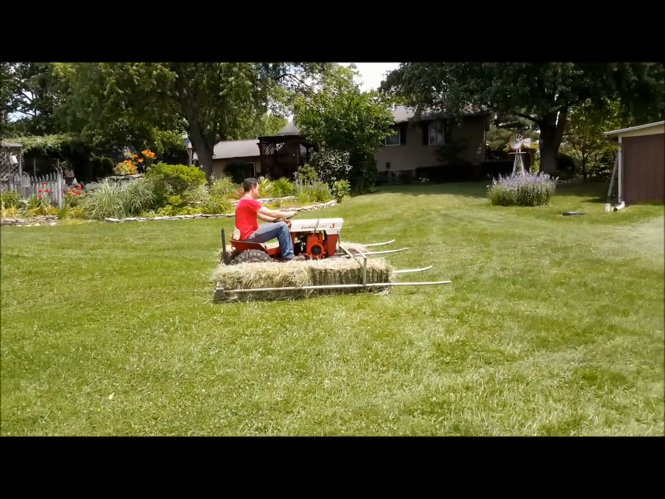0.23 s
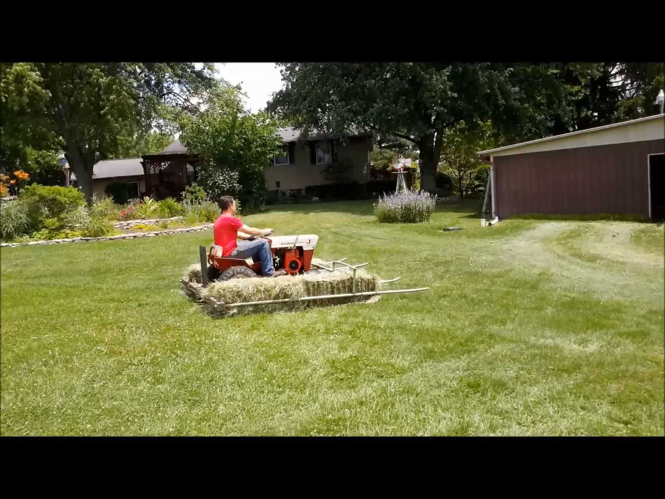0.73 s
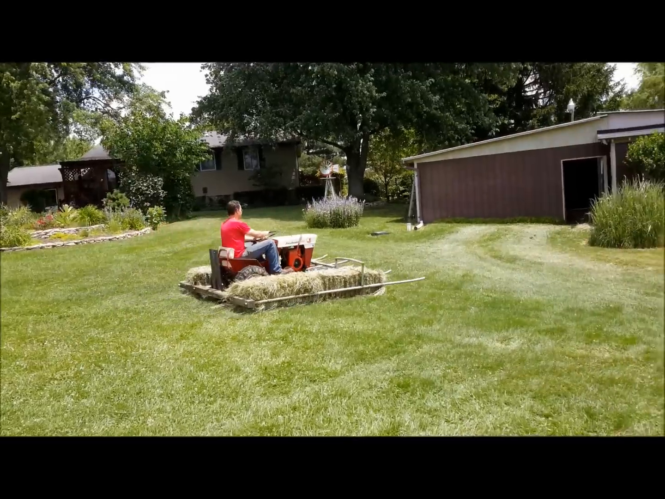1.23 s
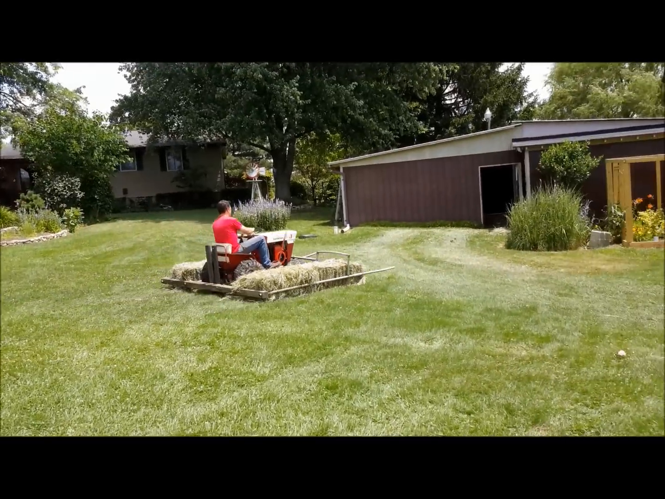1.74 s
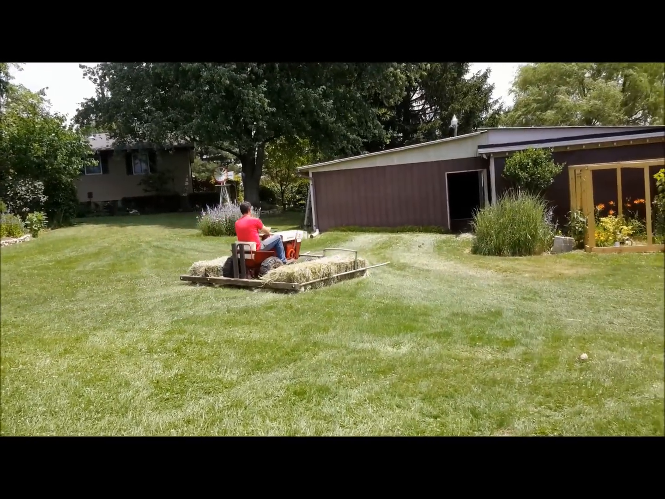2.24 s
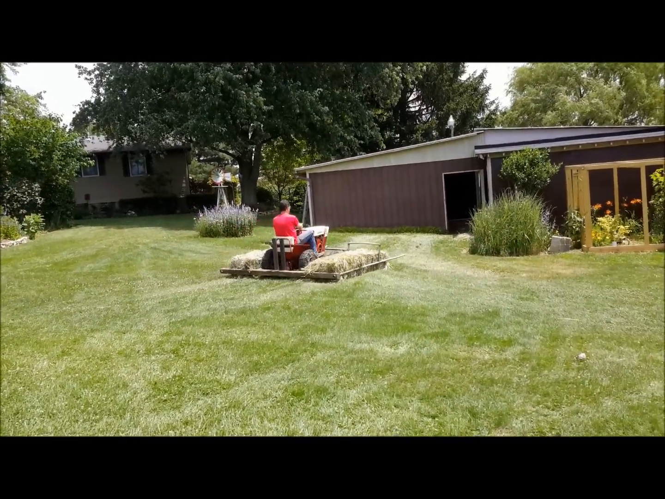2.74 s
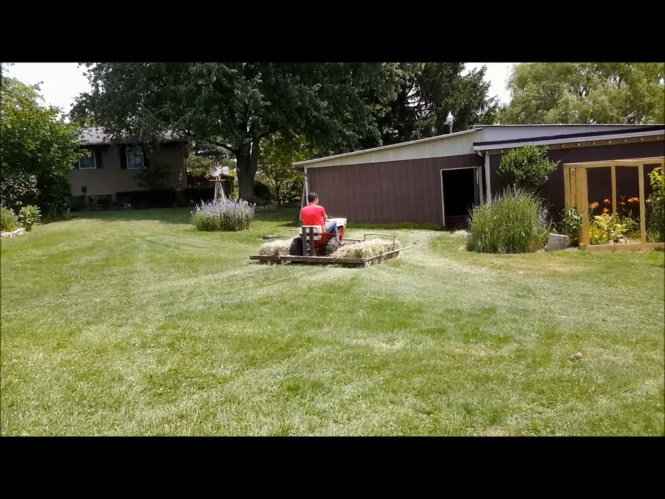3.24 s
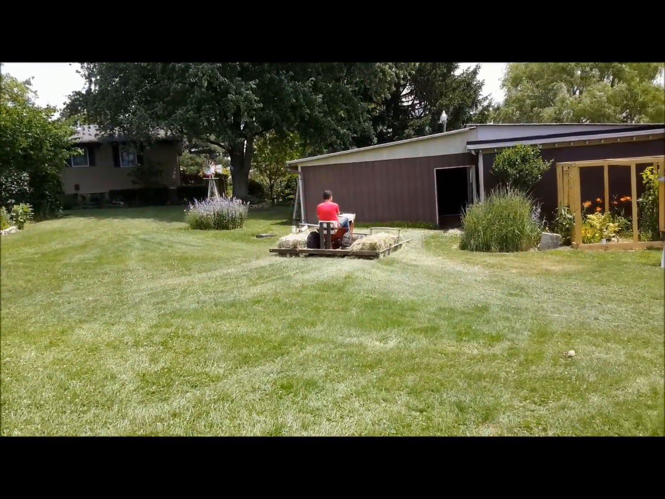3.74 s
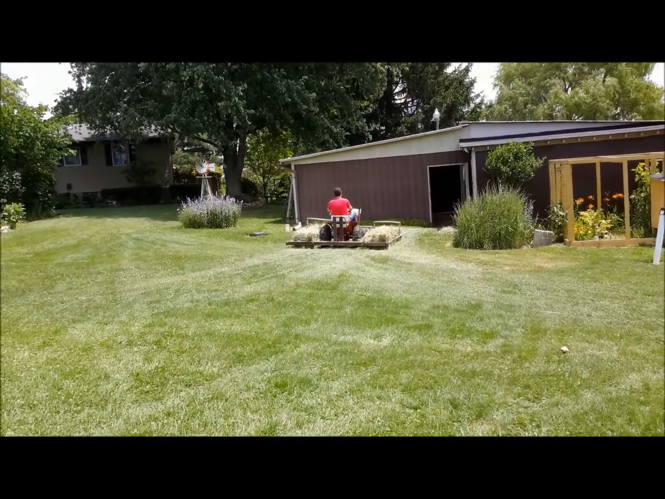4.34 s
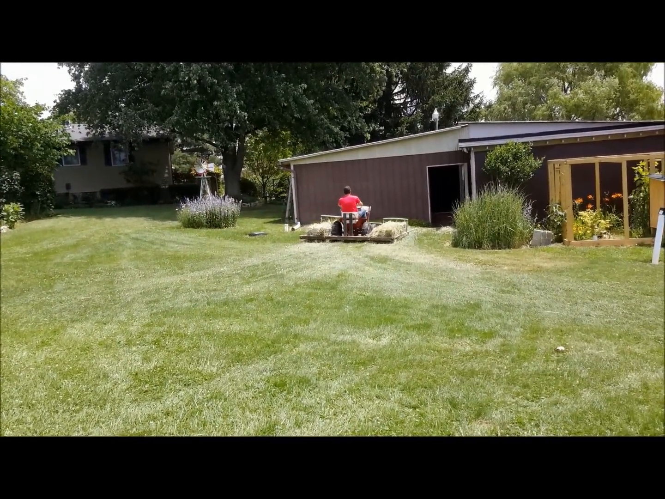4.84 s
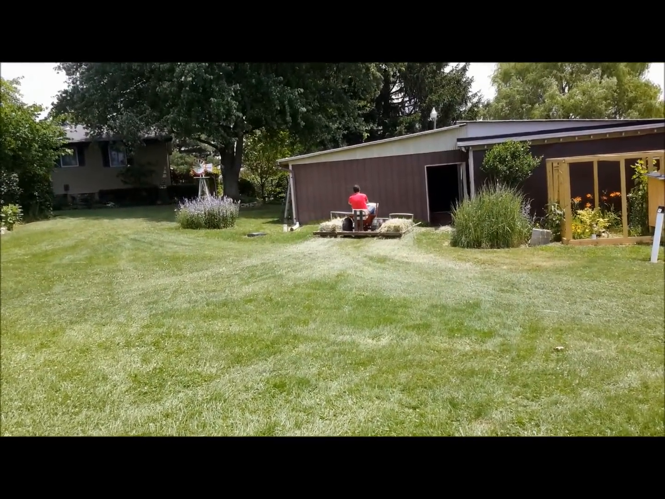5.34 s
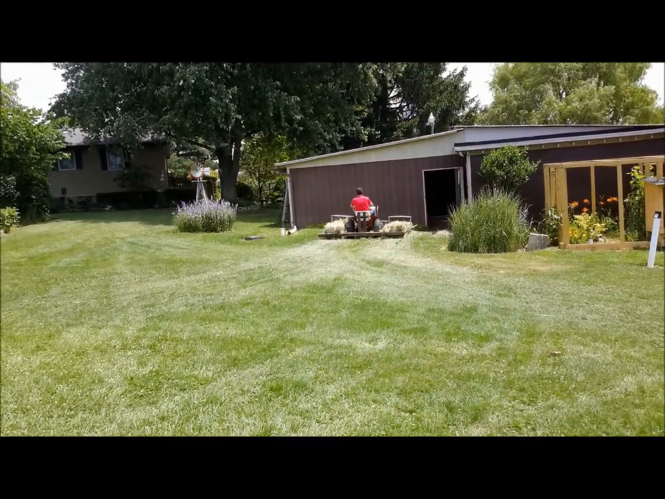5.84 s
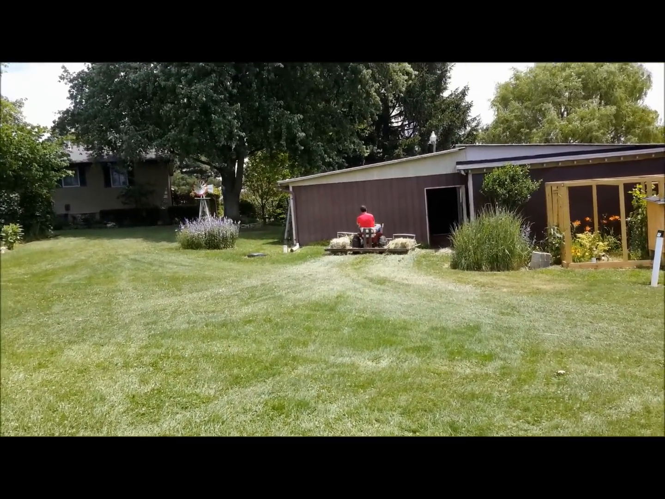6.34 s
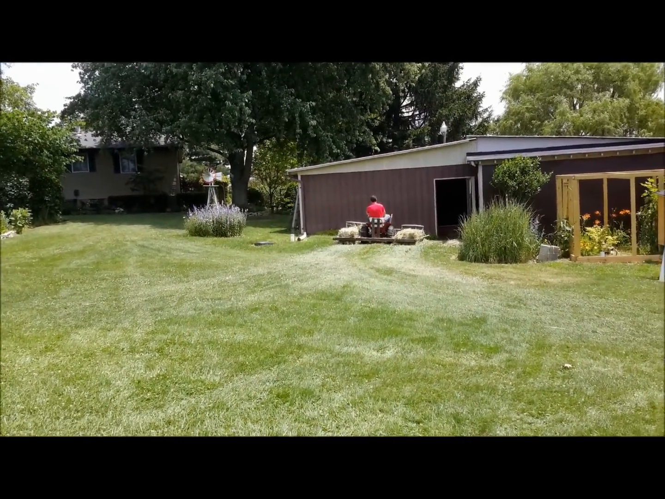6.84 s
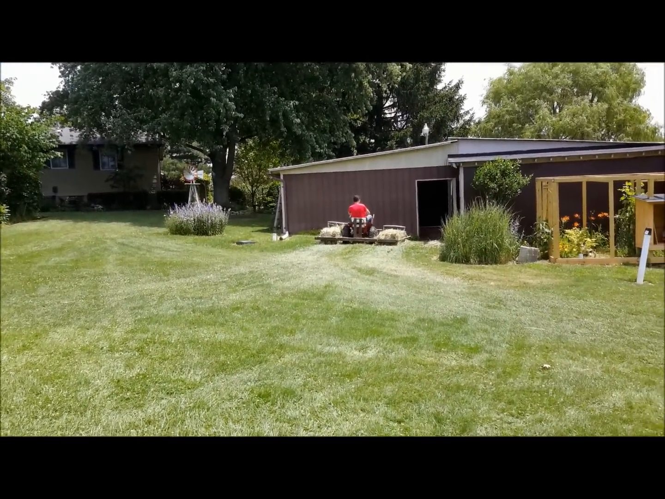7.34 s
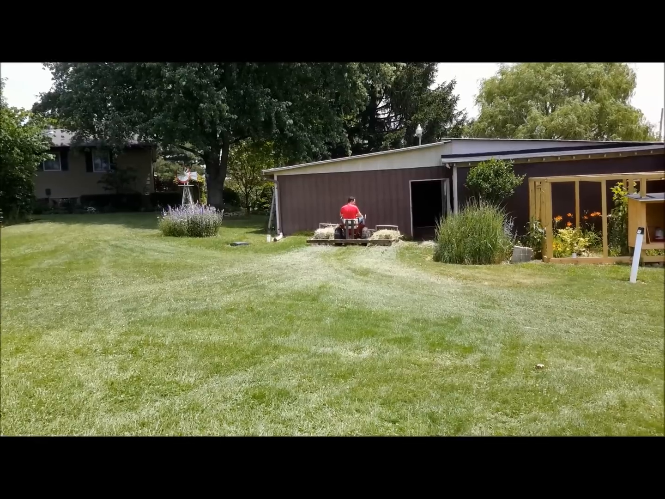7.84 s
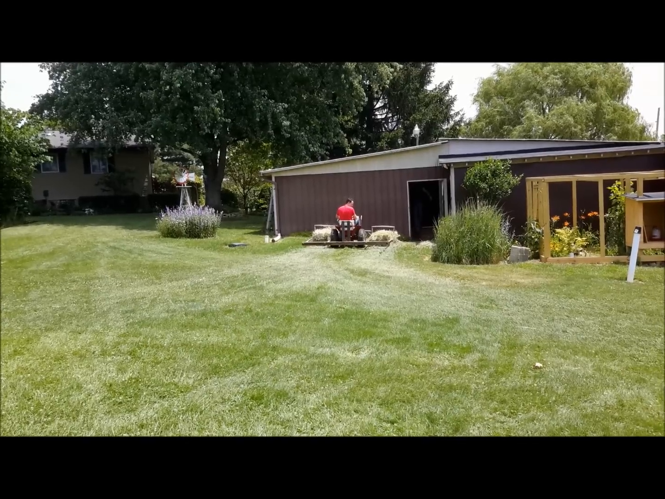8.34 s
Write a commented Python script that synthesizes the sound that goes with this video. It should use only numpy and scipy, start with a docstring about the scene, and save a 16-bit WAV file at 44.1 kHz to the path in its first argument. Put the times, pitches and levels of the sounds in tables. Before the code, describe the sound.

A one-cylinder garden tractor is running close by outdoors from the start, with a rapid, even exhaust thud, metallic clatter and valve ticking. Wind rumbles on the microphone, with sharp buffeting thumps strongest from 1 to 2.5 seconds and from 5 to 6 seconds, and brief ones near 6.7 and 7.7. A slipping belt chirps rhythmically from about 0.5 to 2 seconds, from 2.5 to 5.5, and briefly near 7.8. The load carrier gives short, high squeaks around 1, 1.5, 4 and 5.4 seconds. A very faint, high sizzle lies underneath until about 6 seconds. From then on the clatter is softer and more distant, and the engine slows, sagging lowest near 7.7 seconds before picking up a little. A few small birds chirp faintly between 6 and 8 seconds. The engine is still running at the end, around 8.5 seconds.

```python
"""A one-cylinder garden tractor thuds and clatters close by while gusts of wind buffet the microphone.
Each firing sends a pressure pulse from the exhaust and ticks a valve; impacts ring the block and tinware.
A slipping belt chirps once per lap, drifting against the beat, and the carrier squeaks under hay bales.
The tractor crosses a lawn, turns away and slows in front of a shed, whose wall reflects its sound.
A faint, high sizzle comes and goes, and towards the end a few birds chirp."""
import sys
import numpy as np
from scipy import signal
from scipy.fft import rfft, irfft, next_fast_len
from scipy.io import wavfile
from scipy.ndimage import uniform_filter1d, map_coordinates

SR = 44100
rng = np.random.default_rng(int(sys.argv[2]) if len(sys.argv) > 2 else 0)


def dump(signal):
    """Clip the signal to [-1, 1] and save it as 16-bit WAV at the path in sys.argv[1]."""
    limited = np.clip(np.atleast_2d(signal).T, -1, 1)
    pcm = np.round(limited * 32767).astype(np.int16)
    wavfile.write(sys.argv[1], SR, pcm)


N = 378813


def amp(db):
    """Decibels to amplitude ratio."""
    return 10 ** (np.asarray(db) / 20)


def unit(x):
    """Normalisation to rms 1."""
    return x / np.sqrt(np.mean(x ** 2) + 1e-20)


def curves(rows):
    """Linear interpolation: one value per sample for each column after the time."""
    times, *columns = np.transpose(rows)
    return [np.interp(np.arange(N) / SR, times, column) for column in columns]


def wobble(rate):
    """Smooth random modulation: a spline through rate knots a second."""
    return map_coordinates(rng.standard_normal(4096), [np.arange(N) * rate / SR], mode="wrap")


def coloured(x, spectrum, size=16384):
    """Minimum-phase filtering by a (frequency_hz, level_db) spectrum, at rms 1."""
    hz, db = np.transpose(spectrum)
    gain = amp(np.interp(np.log(np.fft.rfftfreq(size, 1 / SR) + 1), np.log(hz), db))
    cepstrum = irfft(np.log(np.maximum(gain, 1e-5)))
    cepstrum[1:size // 2] *= 2
    cepstrum[size // 2 + 1:] = 0
    response = irfft(np.exp(rfft(cepstrum)))
    return unit(signal.fftconvolve(x, response)[:N])


def noise(spectrum):
    """Filtered Gaussian noise of rms 1."""
    return coloured(rng.standard_normal(N), spectrum)


def pulses(cycle, place, scatter_db, jitter_s):
    """A quasi-periodic impulse train: one hit each time the cycle passes a place."""
    timing, strength = rng.standard_normal((256, 2)).T
    at = np.interp(np.arange(len(timing)) + place, cycle, np.arange(N), left=-SR, right=2 * N)
    at += jitter_s * SR * timing
    heard = (at >= 0) & (at < N)
    return np.bincount(at[heard].astype(int), amp(scatter_db * strength[heard]), N)


def bursts(hits, rise_s, decay_s):
    """An envelope of rms 1 with exponential rise and decay after each hit."""
    t = np.arange(SR // 10) / SR
    return unit(signal.fftconvolve(hits, (1 - np.exp(-t / rise_s)) * np.exp(-t / decay_s))[:N])


def swells(rows, attack_s, release_s):
    """Incoherent addition: the powers of (start_s, length_s, level_db) envelopes sum to one gain."""
    t, power = np.arange(N) / SR, np.zeros(N)
    for start, length, db in rows:
        rise = 1 - np.exp(-np.maximum(t - start, 0) / attack_s)
        fall = np.exp(-np.maximum(t - start - length, 0) / release_s)
        power += (amp(db) * rise * fall) ** 2
    return np.sqrt(power)


def modes(hits, table):
    """Modal superposition: each hit excites damped sinusoids; the sum has rms 1."""
    t = np.arange(SR // 4) / SR
    ring = sum(amp(db - 60 * t / t60) * np.sin(2 * np.pi * hz * t) for hz, db, t60 in table)
    return unit(signal.fftconvolve(hits, ring)[:N])


def ringing(hits, t60_s):
    """Modal overlap: dense resonances merge into an impulse response of decaying noise."""
    t = np.arange(SR // 4) / SR
    tail = rng.standard_normal(len(t)) * amp(-60 * t / t60_s)
    return signal.fftconvolve(hits, tail / np.linalg.norm(tail))[:N]


def delayed(x, seconds):
    """Propagation delay, which may change with time."""
    return np.interp(np.arange(N) - seconds * SR, np.arange(N), x, left=0)


def facing(view, levels_db):
    """Directivity: gain interpolated between views 0 (flank), 1 (rear) and 2 (far off)."""
    return amp(np.interp(view, np.arange(len(levels_db)), levels_db))


# engine speed: time_s, firing_rate_hz
SPEED = [(0.0, 23.42), (0.72, 22.62), (1.17, 22.76), (1.88, 22.03), (2.2, 22.32), (3.21, 22.07),
         (3.61, 22.62), (4.0, 22.15), (4.31, 22.62), (4.73, 22.34), (5.42, 22.6), (5.89, 21.95),
         (6.47, 20.08), (7.22, 18.96), (7.68, 16.17), (7.89, 18.1), (8.11, 19.35), (8.28, 19.7),
         (8.59, 19.5)]

def thud(cycle, place, pitch_hz, width_s, scatter_db):
    """A bipolar pressure pulse: air is pushed and sucked each time the cycle passes a place."""
    firing = np.round(cycle - place)
    t = (cycle - place - firing) / curves(SPEED)[0]
    size = amp(scatter_db * rng.standard_normal(256))[firing.astype(int)]
    return -size * np.exp(-(t / width_s) ** 2) * np.sin(2 * np.pi * pitch_hz * t)


def pulling():
    """Acceleration: the rise of the firing rate in Hz per second, capped at full throttle."""
    firing_hz = uniform_filter1d(curves(SPEED)[0], size=SR // 5)
    return np.clip(np.gradient(firing_hz) * SR, 0, 7)


# strength of the exhaust: time_s, level_db
EXHAUST_LEVEL = [(0, -36), (.4, -32.5), (1.35, -25), (2, -27), (2.8, -33), (3.55, -26), (4.3, -27),
                 (4.8, -29), (5.25, -23.5), (5.62, -33), (5.95, -29.5), (7.4, -32.5), (8.59, -29.5)]
# the thud, deep and long from the flank, tighter from behind: time_s, pitch_hz, width_s
THUD_SHAPE = [(0, 164, 0.0073), (1.7, 154, 0.0058), (2.7, 170, 0.0036), (3.6, 178, 0.0035),
              (5.3, 177, 0.0031), (6.8, 199, .0045), (7.4, 190, 0.0041), (7.8, 161, 0.003),
              (8.59, 182, 0.0042)]
# reflection from the buildings: time_s, delay_s, amplitude_ratio
ECHO = [(0, 0.0082, 0.74), (.8, 0.0091, 0.8), (2.6, 0.0081, 0.41), (5.6, 0.0077, 0.49), (6.3, 0.015, 0.36),
        (6.9, 0.013, 0.74), (7.45, .013, 0.97), (7.7, 0.014, 0.74), (8.59, 0.017, .38)]
# intake gulp against the thud: flank_db, rear_db, far_db
INTAKE_DB = [-6.5, -9.5, -15.5]
# muffler resonances: pitch_hz, level_db, t60_s
MUFFLER_MODES = [(132.2, 1, 0.17), (205.4, -6.5, 0.21), (254.4, -1.5, 0.15)]

def exhaust(cycle, view):
    """Cavity resonance: the muffler hums on after each thud, its echo and a weaker intake gulp."""
    pitch_hz, width_s = curves(THUD_SHAPE)
    delay_s, reflection = curves(ECHO)
    thuds = thud(cycle, .04, pitch_hz, width_s, scatter_db=0.55)
    gulps = facing(view, INTAKE_DB) * thud(cycle, .66, pitch_hz=280.6, width_s=0.0055, scatter_db=0.7)
    puffs = thuds + reflection * delayed(thuds, delay_s) + gulps
    hum = amp(-22.5) * modes(puffs, MUFFLER_MODES)
    return amp(curves(EXHAUST_LEVEL)[0]) * (puffs + hum)


# relative strength of the mechanical noise: time_s, clatter_db, block_db
MACHINE_LEVELS = [(0.0, -50, -50), (0.5, -52, -52), (0.72, -46.5, -46.5), (.92, -47.5, -46),
                  (1.06, -47, -47), (2.13, -48.5, -49), (2.3, -54, -58), (2.82, -52.5, -57.5),
                  (2.92, -56.5, -61.5), (3.39, -48.5, -53.5), (5.48, -51.5, -56.5), (6.0, -58.5, -59),
                  (7.49, -58, -62), (7.8, -58, -60), (8.59, -54.5, -60.5)]
# blows in one four-stroke cycle: place_cycles, knock_db, hiss_db
STROKES = [(-.04, -5.5, 10.5), (.22, -9, -2.5), (.55, -9.5, 2.5)]
# spectrum of the engine block: frequency_hz, level_db
BLOCK_SPECTRUM = [(250, -23.5), (430, -12.5), (525, -2), (590, 4), (730, 6.5), (850, -1.5), (1120, -5.5),
                  (1300, -1.5), (1480, -5.5), (1650, 0), (1850, -30), (2400, -49.5)]
# resonances of the block and its cowling: pitch_hz, level_db, t60_s
BLOCK_MODES = [(603.7, -2.5, 0.055), (728, 1.5, 0.23), (1061, -15, 0.19), (1298, 6, 0.057),
               (1463, -5, 0.16)]
# tones of the flywheel fan and gears: cycles_per_firing, flank_db, rear_db, far_db
DRONES = [(26, -5.5, -3.5, -18.5), (33, -6, -3.5, -20)]

def block(cycle, view):
    """Impact excitation: firing and valves ring the block, over fan rush and blade and gear harmonics."""
    hits = sum(amp(db) * pulses(cycle, place, scatter_db=3.5, jitter_s=.00003)
               for place, db, _ in STROKES)
    knocks = coloured(ringing(hits, t60_s=0.053), BLOCK_SPECTRUM) + amp(-5) * modes(hits, BLOCK_MODES)
    drone = sum(facing(view, levels) * amp(4 * wobble(3.7)) * np.sin(2 * np.pi * order * cycle)
                for order, *levels in DRONES)
    rush = amp(1) * noise(BLOCK_SPECTRUM)
    return amp(curves(MACHINE_LEVELS)[1] + 4.5) * unit(knocks + rush + drone)


# spectra of the tinware close by and far off: frequency_hz, level_db
TIN_NEAR = [(1300, -38), (1820, -6), (2150, 6.5), (2420, -2), (2750, 3.5), (3120, -1), (3500, 2.5),
            (4200, 5.5), (5300, 1), (6300, -5.5), (8000, -15), (10000, -21.5), (13500, -41), (15000, -71)]
TIN_FAR = [(1060, -46), (1800, -5), (2180, 6), (2410, -10), (2670, 4), (3000, -5.5), (3320, 7.5),
           (3560, -6.5), (3830, 8), (4400, 4.5), (4750, 3.5), (6140, -5.5), (6810, -10.5), (8370, -15),
           (12300, -31), (14000, -54)]
# resonances of the thin tinware: pitch_hz, level_db, t60_s
TIN_MODES = [(2202, -6.5, 0.081), (2718, 5.5, 0.022), (2790, -7.5, 0.049), (3484, -1, 0.077),
             (4260, -0.5, 0.043), (4970, -6, 0.043)]
# gains of the tinware's ring and of the whole clatter: flank_db, rear_db, far_db
RATTLE_DB = [-10, -8.5, -9]
CLATTER_DB = [5, 2, 5]

def clatter(cycle, view):
    """Amplitude-modulated noise: each stroke spits a burst of hiss and shakes the tinware."""
    hits = sum(amp(db) * pulses(cycle, place, scatter_db=.9, jitter_s=.0004) for place, _, db in STROKES)
    distance = np.clip(view - 1, 0, 1)
    # distance smears the bursts unless the engine pulls hard
    smear_db = distance * np.maximum(18 - 2.5 * pulling(), 0)
    spit = bursts(hits, rise_s=0.0055, decay_s=0.0072) * amp(-2.5 - smear_db)
    hiss = rng.standard_normal(N) * np.sqrt((1 + spit ** 2) / (1 + np.mean(spit ** 2)))
    rattle = modes(bursts(hits, rise_s=0.0013, decay_s=0.0056) * rng.standard_normal(N), TIN_MODES)
    hiss += amp(-7.5) * unit(ringing(hits, t60_s=0.27))
    near = np.sqrt(1 - distance) * coloured(hiss, TIN_NEAR)
    far = np.sqrt(distance) * coloured(hiss, TIN_FAR)
    tin = amp(-1) * (near + far) + facing(view, RATTLE_DB) * rattle
    return amp(curves(MACHINE_LEVELS)[0]) * facing(view, CLATTER_DB) * tin


# resonances of the loose cowling: pitch_hz, level_db, t60_s
COWLING_MODES = [(673, 0.5, 0.073), (1300, -2, 0.087), (1505, -0.5, 0.1), (2206, -18, .06),
                 (2900, -4.5, .06), (3240, -3, 0.062)]
# gain of its rattle: flank_db, rear_db, far_db
COWLING_DB = [-3, -11, -10.5]

def cowling(view, contacts_per_s=100):
    """A Poisson process: random contacts ring each mode of the loose cowling with a new strength."""
    contacts = rng.random(N) < contacts_per_s / SR
    ring = sum(amp(db) * modes(contacts * rng.standard_normal(N), [(hz, db, t60)])
               for hz, db, t60 in COWLING_MODES)
    return amp(curves(MACHINE_LEVELS)[0]) * facing(view, COWLING_DB) * unit(ring)


# gain of the valve tick: flank_db, rear_db, far_db
TICK_DB = [-3, -7, -12.5]

def tappet(cycle, view):
    """Impact noise: a valve ticks once per firing, harder while the engine picks up speed."""
    hits = pulses(cycle, -0.034, scatter_db=1, jitter_s=.0005)
    strikes = bursts(hits, rise_s=.002, decay_s=.0027)
    ring = noise([(2000, -33), (3500, -3), (4500, 1), (5300, 5.5), (5900, -5.5), (7000, -18.5),
                  (14000, -30)])
    return amp(curves(MACHINE_LEVELS)[0] + 1.2 * pulling()) * facing(view, TICK_DB) * strikes * ring


def eddies(spectrum, lumps_db):
    """Intermittent turbulence: noise in lumps a few milliseconds long, at an even mean strength."""
    air = coloured(rng.standard_normal(N) * amp(lumps_db * wobble(110)), spectrum)
    return air / np.sqrt(abs(uniform_filter1d(air ** 2, size=SR // 7)) + 1e-9)


# the air between gusts: time_s, strength_db
BREEZE = [(0, -45.5), (2.2, -41.5), (2.8, -48.5), (3.4, -40.5), (6.2, -42.5), (7, -46.5), (8.59, -46)]
# gusts: start_s, length_s, strength_db, edge_db (extra strength for the flutter alone)
GUSTS = [(0, 0.12, -35, -1), (0.955, 0.19, -39.5, -2.5), (1.154, 0.19, -33.5, 1),
         (1.535, 0.066, -32.5, -5.5), (1.745, 0.023, -31, 1), (2.069, 0.31, -33, 2),
         (2.335, 0.041, -36, 6.5), (2.433, 0.13, -39.5, 4), (3.177, 0.03, -39.5, -11),
         (3.415, 0.39, -48, -6), (3.92, 0.23, -44, 1.5), (4.519, 0.27, -38.5, 0), (4.86, 0.16, -42.5, -6),
         (5.01, 0.11, -33, 0), (5.124, 0.35, -36, -4.5), (5.762, 0.4, -33.5, -5), (6.644, 0.057, -36.5, -6),
         (7.649, 0.025, -36, 0)]
# spectra of the wind's low rumble and higher flutter: frequency_hz, level_db
RUMBLE_SPECTRUM = [(20, -44), (40, -18.5), (65, -3), (110, 3), (200, -1), (300, -5), (420, -27), (600, -42),
                   (1000, -74.5)]
FLUTTER_SPECTRUM = [(90, -20.5), (220, -6.5), (340, 1.5), (480, -6.5), (700, -20.5), (1100, -30.5),
                    (2200, -69)]

def wind():
    """Turbulent pressure: eddies hit the microphone, and stronger gusts reach higher frequencies."""
    breeze = amp(curves(BREEZE)[0] + 1.5 * wobble(5.5))

    def blowing_db(gusts):
        return 20 * np.log10(np.hypot(breeze, swells(gusts, attack_s=0.006, release_s=0.045)))

    wind_db = blowing_db([(start, length, db) for start, length, db, _ in GUSTS])
    edged_db = blowing_db([(start, length, db + edge) for start, length, db, edge in GUSTS])
    lull_db = np.clip(wind_db + 37, -8, 0) * .4  # weak wind is quieter still
    rumble = amp(0.98 * wind_db + lull_db - 0.5) * eddies(RUMBLE_SPECTRUM, lumps_db=3)
    flutter = amp(1.73 * edged_db + lull_db + 18) * eddies(FLUTTER_SPECTRUM, lumps_db=6.3)
    return rumble + flutter


# spells of sizzle: start_s, length_s, level_db
SIZZLE_SPELLS = [(0, 2.4, -75), (2.4, 1.1, -76), (3.45, 2.8, -72.5), (4.2, 0.16, -72)]
# spectrum of the sizzle: frequency_hz, level_db
SIZZLE_SPECTRUM = [(8000, -25), (10400, -7), (11500, -8), (12400, 0), (13800, -1), (14600, -15)]

def sizzle():
    """Random amplitude modulation gives a faint, very high band of noise a fine grain."""
    grain_db = 3 * wobble(12) + 3 * wobble(300)
    return swells(SIZZLE_SPELLS, attack_s=0.0082, release_s=0.16) * amp(grain_db) * noise(SIZZLE_SPECTRUM)


# spectrum of the garden's background: frequency_hz, level_db
GARDEN_SPECTRUM = [(20, -6), (90, -31), (300, 6), (1000, -1.5), (4000, -3), (8000, -38), (14000, -85)]

def garden():
    """Ambient noise: a faint, stationary, broadband hush."""
    return amp(-59) * noise(GARDEN_SPECTRUM)


# sharp slaps of wind: start_s, thump_db, pitch_hz, snap_db
SLAPS = [(0.018, -20, 128, -45), (.029, -20, 300, -26), (0.087, -17, 113, -19), (0.979, -12, 167, -40),
         (0.991, -18.5, 395, -26), (1.031, -13.5, 268, -28), (1.132, -13, 140, -33), (1.155, -19, 308, -31),
         (1.170, -35, 442, -15.5), (1.195, -24, 470, -33), (1.307, -19, 316, -37), (1.755, -12, 196, -40),
         (1.765, -12, 150, -38), (1.782, -11, 230, -34), (2.097, -19, 365, -37), (2.193, -9.5, 273, -19),
         (2.233, -23, 395, -36), (2.256, -9.5, 133, -26), (2.330, -16, 425, -23), (2.337, -22, 307, -19),
         (2.348, -22, 487, -31), (2.371, -17, 380, -19), (2.435, -18.5, 304, -26), (2.55, -15, 177, -28),
         (3.607, -16, 222, -48), (5.016, -12, 295, -25), (5.05, -13.5, 257, -28), (5.090, -15, 262, -39),
         (5.104, -10.5, 126, -33), (5.173, -11.5, 244, -34), (5.463, -13, 178, -31),
         (5.803, -22, 377.5, -36), (5.811, -11.5, 282, -40), (5.884, -17, 256, -29), (5.927, -17, 110, -45),
         (6.025, -14, 303, -46), (6.081, -14.5, 290, -38), (6.662, -12, 298, -28), (6.72, -19, 141, -55),
         (6.956, -20, 209, -48), (7.641, -11.5, 132, -52), (7.667, -22, 187, -46)]

def slaps(snap_hz=650):
    """Pressure transients: a single eddy gives a thump of one or two swings, with a snap at its crest."""
    t, out = np.arange(SR // 10) / SR, np.zeros(N + SR)
    crest = 0.65  # swings until the envelope peaks

    def thump(swings):
        return np.sin(2 * np.pi * swings) * (swings / 1.023) ** 2 * np.exp(2 - 2 * swings / crest)

    for start, thump_db, hz, snap_db in SLAPS:
        snap = thump(np.maximum(snap_hz * (t - crest / hz) + crest, 0))
        out[round(start * SR):][:len(t)] += amp(thump_db) * thump(hz * t) + amp(snap_db) * snap
    return out[:N]


# creep of the belt on its pulleys: time_s, lag_laps
CREEP = [(0, -0.14), (1.2, 0.0034), (2.1, 0.049), (2.8, -0.021), (3.4, -0.018), (5.2, -0.031),
         (5.55, -0.078), (7.2, -0.037), (7.85, -0.015), (8.59, 0.13)]
# spells in which the belt slips: start_s, length_s, level_db
SLIPS = [(.45, 1.64, -47), (2.5, 2.6, -52.5), (3.19, 0.3, -43.5), (3.42, 0.12, -46.5), (3.72, 1.8, -50),
         (4.17, 0.19, -50.5), (4.78, 0.22, -46), (5.2, 0.17, -45), (7.73, 0.21, -47.5), (8, 0.48, -63)]
# spectrum of the belt's rasp: frequency_hz, level_db
RASP_SPECTRUM = [(1800, -64), (3300, -26), (4150, 5.5), (4500, -1), (4950, 8.5), (5450, 4), (6000, -5.5),
                 (6800, -11), (9000, -22), (12800, -26), (14500, -48)]
# stray chirps against regular ones, and squeal against rasp: flank_db, rear_db, far_db
STRAY_DB = [-7, -18, -15]
SQUEAL_DB = [-3.5, 1.5, 3]

def belt(cycle, view, laps_per_firing=1.0117, gripping_db=-86):
    """Sliding friction: a worn spot on the belt chirps in the pulley once a lap, barely when it grips."""
    laps = cycle * laps_per_firing - curves(CREEP)[0]
    hits = pulses(laps, -0.047, scatter_db=1.6, jitter_s=.0005)
    hits += facing(view, STRAY_DB) * pulses(laps, .45, scatter_db=3.5, jitter_s=.007)
    chirps = uniform_filter1d(bursts(hits, rise_s=0.0014, decay_s=0.0034), size=130)
    # the pulley rings on, and from afar the yard draws each chirp out
    tail = amp(-15 + 12 * np.clip(view - 1, 0, 1)) * bursts(hits, rise_s=.005, decay_s=.017)
    envelope = np.sqrt((chirps ** 2 + tail ** 2) / (1 + uniform_filter1d(tail ** 2, size=SR // 4)))
    squeal_hz = 5250 + 190 * wobble(60) + 200 * wobble(900)
    squeal = np.sqrt(2) * np.sin(2 * np.pi * np.cumsum(squeal_hz) / SR)
    scrape = noise([(900, -41), (2200, -1.5), (2430, -6.5), (2720, 3.5), (4200, -18.5), (7000, -37),
                    (14000, -41)])
    friction = unit(noise(RASP_SPECTRUM) + facing(view, SQUEAL_DB) * squeal + amp(-7.5) * scrape)
    strength = amp(gripping_db) + swells(SLIPS, attack_s=0.0067, release_s=0.067)
    return strength * envelope * friction


# squeaks of the jolting carrier, then in the last row a separate brief high tick that is no squeak: centre_s,
# level_db, pitch_hz, width_s
SQUEAKS = [(1.058, -38.5, 4410, 0.029), (1.448, -35.5, 4470, 0.038), (3.924, -40, 4730, 0.032),
           (3.979, -36.5, 4370, 0.028), (4.236, -36.5, 4850, 0.037), (5.367, -42.5, 4320, 0.033),
           (7.691, -39, 4540, 0.007)]

def carrier(waver_hz=278.6, scrape_hz=344.8, full_scrape_db=-36.5):
    """Random frequency modulation: the loaded frame squeaks; harder jolts widen the tone to a scrape."""
    t, out = np.arange(N) / SR, np.zeros(N)
    drift = np.cumsum(wobble(2500)) / SR
    for centre, db, hz, width in SQUEAKS:
        near = abs(t - centre) < 2 * width
        swell = amp(db) * np.exp(-2 * ((t[near] - centre) / width) ** 2)
        deviation_hz = waver_hz + scrape_hz * min(amp(db - full_scrape_db), 1) ** 3
        out[near] += swell * np.sin(2 * np.pi * (hz * t[near] + deviation_hz * drift[near]))
    return out


def shed(direct, view, echo_db=3):
    """Specular reflection: in front of the shed its wall doubles every tick and knock."""
    reflection = amp(echo_db) * np.clip(view - 1, 0, 1)
    echo = reflection * delayed(direct, curves(ECHO)[0])
    return (direct + echo) / np.hypot(1, reflection)


# bird chirps: centre_s, relative_level_db, pitch_hz, width_s, slide_hz (per width)
BIRD_NOTES = [(6.015, -43.5, 4470, .036, 0), (6.092, -46, 4400, 0.031, 201), (6.32, -53, 5350, .028, -400),
              (7.065, -45, 4440, 0.036, 42), (7.148, -43, 3800, .016, -100), (7.443, -51, 5820, .016, -300),
              (7.539, -52.5, 4820, .028, 100), (8.06, -44.5, 4630, 0.024, -100),
              (8.145, -46, 3900, .022, -150)]

def birds(arch_hz=221.7, tremble_hz=141):
    """Frequency glides: each small bird's note arches, slides and trembles, then reverberates briefly."""
    t, notes = np.arange(N) / SR, np.zeros(N)
    tremble = tremble_hz * wobble(700)
    for centre, db, hz, width, slide_hz in BIRD_NOTES:
        near = abs(t - centre) < 2 * width
        offset = (t[near] - centre) / width
        pitch_hz = hz + slide_hz * offset - arch_hz * offset ** 2 + tremble[near]
        notes[near] += amp(db) * np.exp(-2 * offset ** 2) * np.sin(2 * np.pi * np.cumsum(pitch_hz) / SR)
    return amp(-3) * notes + amp(-6) * ringing(notes, t60_s=.15)


# the side that faces the listener: time_s, view (0 flank, 1 rear, 2 far off by the shed)
VIEW = [(0, 0), (1.7, 0), (2.6, 1), (5.2, 1), (6.3, 2), (8.59, 2)]

def scene():
    """Superposition: the tractor, timed by its crank, adds to the sounds of the garden."""
    cycle = .71 + np.cumsum(curves(SPEED)[0]) / SR  # phase in firings
    view = curves(VIEW)[0]
    engine = block(cycle, view) + clatter(cycle, view) + cowling(view) + tappet(cycle, view)
    machinery = engine + belt(cycle, view) + carrier()
    tractor = exhaust(cycle, view) + shed(machinery, view)
    return (tractor + birds() + wind() + slaps() + sizzle() + garden())[None]


def record(dry):
    """Band limiting: an ideal low-pass filter removes the highest treble."""
    size = next_fast_len(N + SR // 2)
    passband = np.fft.rfftfreq(size, 1 / SR) < 14400
    return irfft(rfft(dry, size) * passband, size)[:, :N]


dry = scene()
out = record(dry)
dump(out)
```